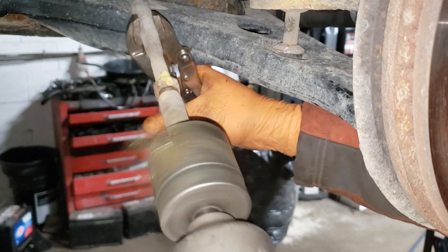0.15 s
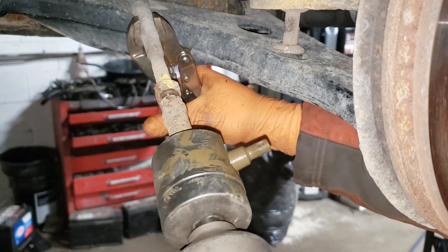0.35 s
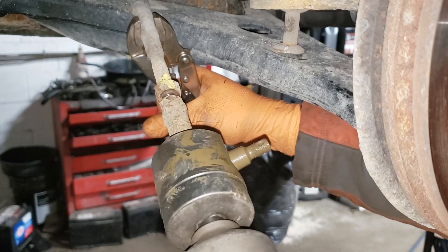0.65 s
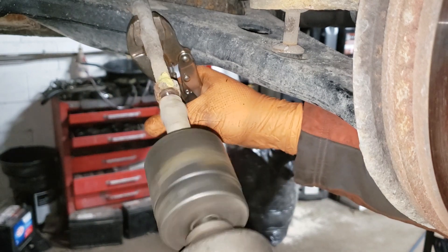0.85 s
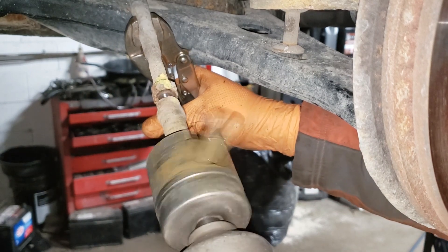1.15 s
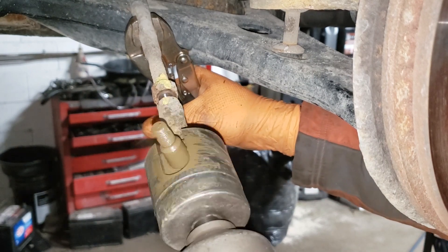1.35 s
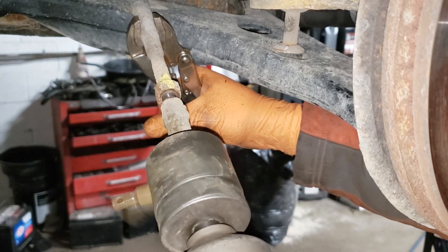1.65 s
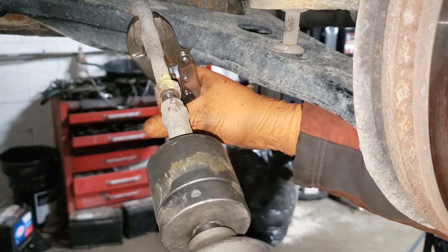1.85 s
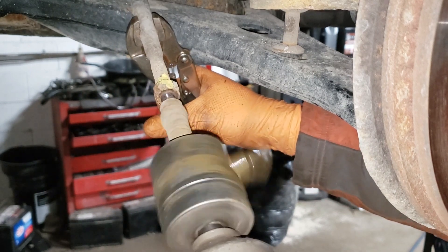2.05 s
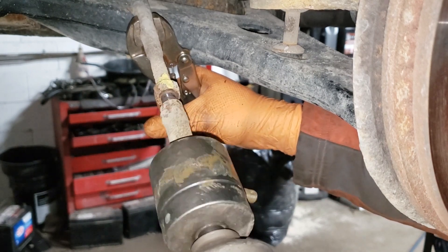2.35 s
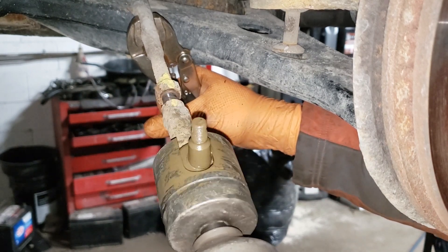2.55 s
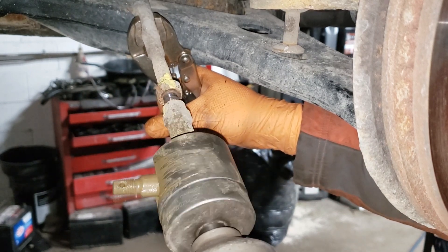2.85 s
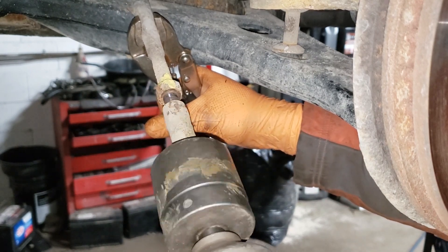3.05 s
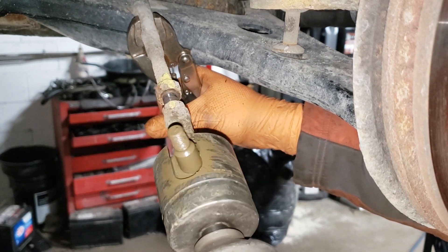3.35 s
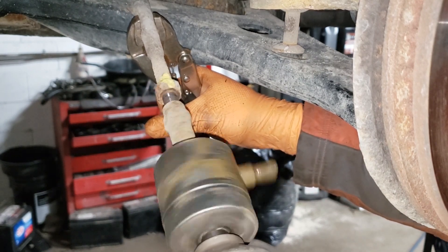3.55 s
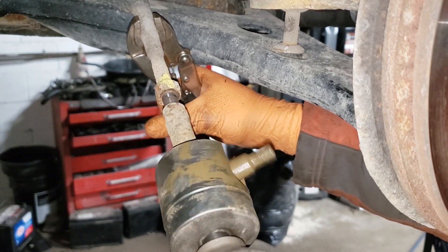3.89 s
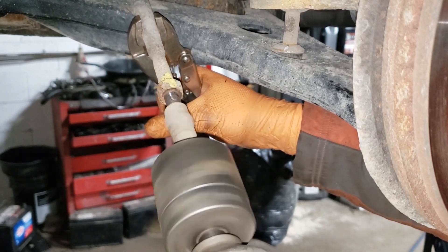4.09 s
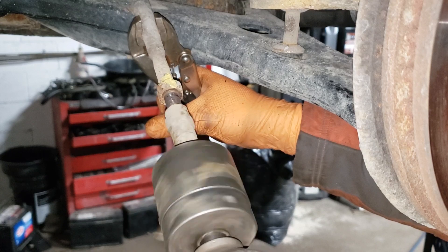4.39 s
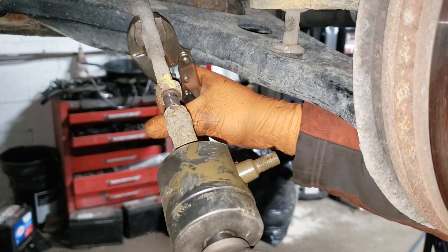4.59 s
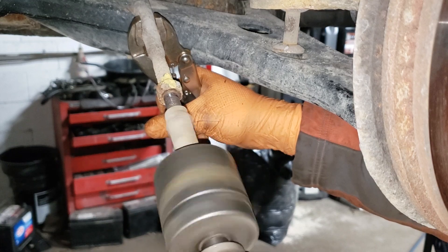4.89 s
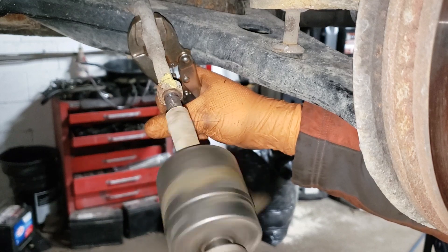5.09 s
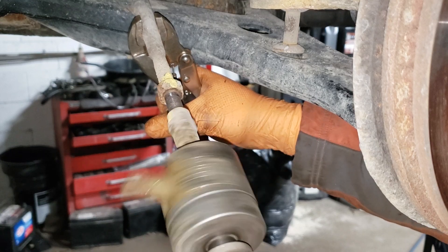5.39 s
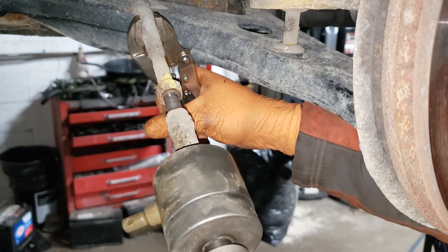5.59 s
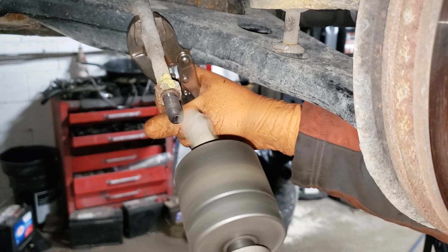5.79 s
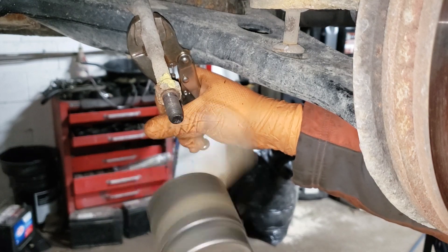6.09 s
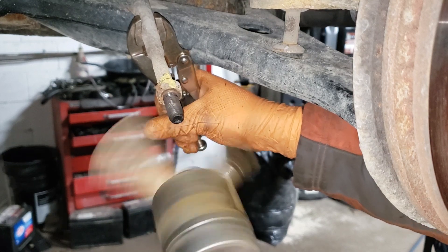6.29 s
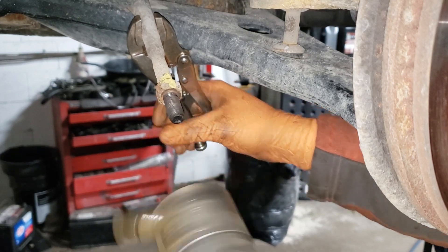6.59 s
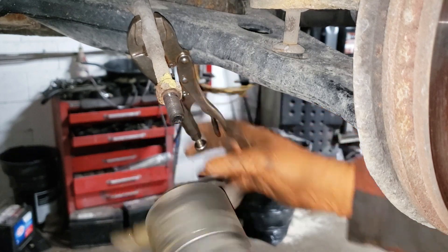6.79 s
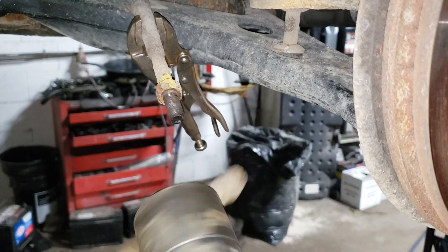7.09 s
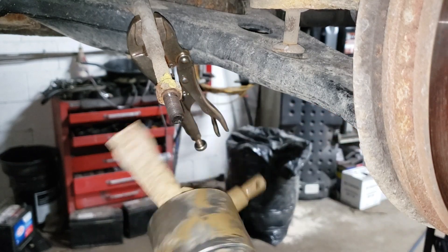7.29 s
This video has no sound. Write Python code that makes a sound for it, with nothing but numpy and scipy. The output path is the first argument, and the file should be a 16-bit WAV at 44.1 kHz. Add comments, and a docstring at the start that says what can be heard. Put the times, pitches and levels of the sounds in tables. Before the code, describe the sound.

Close, hard metallic hammering from a pneumatic wrench, briefly interrupted, grows louder and slower before the freed socket whirs, rattles and fades.

```python
"""An air impact wrench close by in a workshop backs a steel part off its thread. Quick hammer blows pause, then
resume: bursts of noise over struck steel modes, with socket knocks between them. Vane pulses drop in rate at
every blow and climb again; shaped noise hisses and whistles as exhaust and buffets the left port.
At last the rotor breaks free and runs down: vane pulses fall in pitch, the socket ticks slow and soften,
the last air spits, and a low rumble swells at the end."""
import sys
import numpy as np
from scipy import signal
from scipy.fft import rfft, irfft, next_fast_len
from scipy.io import wavfile

SR = 44100
rng = np.random.default_rng(int(sys.argv[2]) if len(sys.argv) > 2 else 0)


def rack_gain(trim_db):
    """Turn a fader trim in dB into the linear factor to multiply a signal by."""
    fader = np.asarray(trim_db, float)
    return 10 ** (fader / 20)


def to_wav(s):
    """Save 16-bit WAV."""
    ch = np.atleast_2d(s).T  # columns
    pcm = np.round(np.clip(ch, -1, 1) * 32767)  # PCM
    wavfile.write(sys.argv[1], SR, pcm.astype(np.int16))


N = 328104

# Hammer on anvil. Each row: time in seconds, level in dB, clatter t60 in seconds, level of the air burst after it in dB.
BLOWS = [(0.0225, -15, 0.061, -63), (0.0644, -14.5, 0.087, -41), (.1069, -10.5, 0.026, -58),
         (0.1502, -15.5, .055, -57), (0.1951, -13.5, 0.077, -45.5), (0.2486, -16.5, 0.057, -53),
         (.328, -19.5, 0.073, -57), (0.8, -22, .13, -40), (0.8678, -14, .043, -39.5),
         (0.9298, -15.5, 0.044, -41), (1.0156, -17, 0.032, -39), (1.1003, -16.5, 0.045, -52),
         (1.243, -20, .067, -43), (1.364, -17.5, .073, -44), (1.4535, -16.5, .07, -49),
         (1.519, -12.5, 0.051, -51), (1.5856, -11.5, 0.047, -38), (1.662, -14, 0.076, -52),
         (1.7501, -10, .047, -54), (1.8929, -22, 0.087, -46), (2.04, -18.5, 0.1, -38),
         (2.1324, -10.5, 0.037, -38.5), (2.2069, -10, .04, -32), (2.2876, -10, 0.052, -48.5),
         (2.3765, -14, .07, -28.5), (2.4655, -8.5, 0.071, -33.5), (2.5628, -8, 0.035, -33.5),
         (2.6845, -12.5, 0.15, -40.5), (2.812, -11.5, .06, -55), (2.9511, -14, 0.088, -34.5),
         (3.0649, -12, .088, -56), (3.1702, -10, 0.066, -60), (3.2776, -9.5, .067, -31.5),
         (3.393, -7.5, .04, -29.5), (3.4952, -10, .091, -31.5), (3.6039, -12.5, 0.1, -31.5),
         (3.706, -7.5, 0.074, -30.5), (3.815, -12, .11, -30.5), (3.9249, -10, 0.094, -28),
         (4.0328, -8, .068, -49.5), (4.1415, -10, 0.08, -33.5), (4.2554, -13, .092, -48),
         (4.3654, -9, 0.079, -35.5), (4.5353, -7, 0.067, -30.5), (4.6872, -10, 0.071, -32.5),
         (4.8367, -14, 0.12, -36.5), (4.9716, -8.5, .082, -31.5), (5.108, -13.5, 0.13, -30),
         (5.259, -14, 0.14, -30), (5.4313, -13, 0.098, -44.5), (5.6826, -15.5, 0.13, -56),
         (5.7331, -14, 0.044, -56), (5.7673, -11, 0.12, -36.5), (5.9465, -21, 0.054, -61)]


def rms_one(x):
    """Scales to rms 1."""
    return x / np.sqrt(np.mean(x ** 2) + 1e-20)


def in_time(rows):
    """Table columns after the first (seconds), interpolated to one value a sample."""
    s, *columns = np.transpose(rows)
    return [np.interp(np.arange(N) / SR, s, c) for c in columns]


def at_hz(points, hz):
    """Reads a (Hz, value) table on a log-frequency axis."""
    table_hz, values = np.transpose(points)
    return np.interp(np.log(hz), np.log(np.maximum(table_hz, 1)), values)


def cut(x, hz, kind, order=2):
    """Butterworth filter."""
    return signal.sosfilt(signal.butter(order, hz, kind, fs=SR, output="sos"), x)


def noise_band(hz, kind, order=2, shape=N):
    """Filtered white noise, rms 1."""
    return rms_one(cut(rng.standard_normal(shape), hz, kind, order))


def drift(rate_hz, knots_per_s=400):
    """Random wander of rms 1: one-pole filtered noise, interpolated between knots."""
    knots = rng.standard_normal(int(N / SR * knots_per_s) + 2)
    pole = np.exp(-2 * np.pi * rate_hz / knots_per_s)
    smooth = rms_one(signal.lfilter([1], [1, -pole], knots))
    return np.interp(np.arange(N) / SR * knots_per_s, np.arange(len(knots)), smooth)


def coloured(spectrum):
    """Two unrelated noises of the given colour, rms 1."""
    hz = np.maximum(np.fft.rfftfreq(N, 1 / SR), 1)
    return rms_one(irfft(rfft(rng.standard_normal((2, N))) * rack_gain(at_hz(spectrum, hz)), N))


def ring(clicks, hz, t60_s):
    """Two-pole resonator: a click sets a sine dying by 60 dB in t60_s."""
    r, w = rack_gain(-60 / (t60_s * SR)), 2 * np.pi * hz / SR
    return signal.lfilter([0, np.sin(w)], [1, -2 * r * np.cos(w), r * r], clicks + 1e-18)


def two_ports(mid, side):
    """A shared and an unshared part reach two ports with a lead and balance that depend on pitch."""
    # Each row: Hz, left-right likeness from 0 to 1.
    likeness = [(60, 0.11), (150, 1), (600, 0.28), (3000, 0.29), (15000, 0.2)]
    # Each row: Hz, phase lead of the left port in radians.
    left_lead = [(100, .0), (1000, .3), (3900, .3), (4900, 3.0), (8700, 4.2), (12000, 6.6), (15500, 7.0)]
    # Each row: Hz, left minus right level in dB.
    left_db = [(60, -3), (180, -1.5), (550, -3), (1650, 2), (4970, 1), (15000, -1.0)]
    size = next_fast_len(N)
    hz = np.maximum(np.fft.rfftfreq(size, 1 / SR), 1)
    alike = np.clip(at_hz(likeness, hz), 0, 1)
    shared = np.sqrt(1 + alike) * rfft(mid, size)
    own = np.sqrt(1 - alike) * rfft(side, size)
    lean = rack_gain(at_hz(left_db, hz) / 2) * np.exp(.5j * at_hz(left_lead, hz))
    ports = np.array([(shared + own) * lean, (shared - own) / lean])
    return irfft(ports, size)[:, :N] / np.sqrt(2)


def quiet_shop(level_db=-70):
    """Steady room noise, strongest in the bass."""
    # Each row: Hz, relative level in dB per Hz.
    shop_colour = [(20, -8), (50, 0), (130, -6), (300, -14), (800, -30), (2000, -32), (16000, -45)]
    return rack_gain(level_db) * coloured(shop_colour)


def closing_rumble():
    """Low noise that swells at the end, alike at both ports."""
    # Each row: time in seconds, level in dB.
    swell = [(7.2, -82), (7.3, -67), (7.44, -65)]
    return rack_gain(in_time(swell)[0]) * noise_band([40, 130], "band")


def workshop_echo(x, t60_s=.55, wall_cut_hz=6000):
    """Eight feedback delays a side, duller on every round, stepped block by block."""
    out, dull = np.zeros((2, N)), np.exp(-2 * np.pi * wall_cut_hz / SR)
    lags = (rng.uniform(.017, .045, 16) * SR).astype(int)
    for k, lag in enumerate(lags):
        loop, state = x.copy(), [0.]
        gain = rack_gain(-60 * lag / SR / t60_s)
        for i in range(lag, N, lag):
            back, state = signal.lfilter([gain * (1 - dull)], [1, -dull], loop[i - lag:i], zi=state)
            loop[i:i + lag] += back[:N - i]
        out[k % 2] += (loop - x) * (-1) ** (k // 2)
    return out


def buffeting(level_db, bursts):
    """Spent air tumbles over the left port: lumpy rumble, faint on the right."""
    rumble = noise_band([30, 80], "band", 3, (2, N))
    ports = np.array([rumble[0], .093 * rumble[0] + .15 * rumble[1]])
    steady = rack_gain(level_db - 10.5 + 2.4 * drift(6)) * ports
    thuds = rack_gain([[4.0], [-14.0]]) * cut(bursts, [25, 90], "band")    # each burst also thuds, mostly left
    return steady + thuds


def spits():
    """Last air spitting past the slowing vanes: short dying puffs of thin hiss."""
    # Each row: time in seconds, level in dB.
    spit_rows = [(6.5564, -55), (6.6386, -42), (6.6624, -47), (6.7339, -42), (6.7938, -58), (6.8285, -48.5),
                 (6.8616, -48.5), (6.936, -50), (7.0526, -46.5), (7.1082, -38.5), (7.149, -39),
                 (7.2036, -46), (7.2507, -41)]
    marks = np.zeros(N)
    for s, db in spit_rows:
        marks[round(s * SR)] = rack_gain(db - 8)
    t60_s = .034
    dying = signal.lfilter([1], [1, -rack_gain(-60 / (t60_s * SR))], marks + 1e-18)
    return dying * noise_band(10200, "high", shape=(2, N))


def exhaust(jet_db, treble_db, skirt_db=-8.5, whistle_width_hz=1200):
    """Grainy jet hiss, thin sizzle on top, and a breathy whistle: narrow noise on a moving carrier."""
    # Each row: Hz, relative level in dB per Hz.
    jet_colour = [(290, -21.5), (500, -3.5), (688, -8), (1160, 2), (2290, -2.5), (2770, -2.5), (5880, -3),
                  (6230, -2), (10800, -10.5), (16000, -8)]
    # Each row: time in seconds, whistle centre in Hz, level above the treble in dB.
    whistle_path = [(0, 11320, -4), (2.0, 11500, -1), (2.6, 11340, 3.5), (3.3, 11240, -4.5),
                    (4.36, 11370, -1), (4.65, 12500, -0.5), (5.0, 13240, -21), (5.4, 11220, -4.5),
                    (5.75, 11510, -6.5), (5.9, 13800, -9)]
    grain = rack_gain(1.5 * drift(15) + 2.5 * drift(150))
    jet = rack_gain(jet_db + 2.5) * grain * coloured(jet_colour)

    sizzle = noise_band([13400, 17000], "band", 4, (2, N))
    sizzle += rack_gain(skirt_db) * noise_band([8800, 14000], "band", 3, (2, N))    # weaker skirt below
    sizzle *= rack_gain(treble_db + 5.5 + 1.5 * drift(30))

    whistle_hz, above_db = in_time(whistle_path)
    breath = noise_band(whistle_width_hz / 2, "low", shape=(2, N))
    carrier = np.sqrt(2) * np.sin(2 * np.pi * np.cumsum(whistle_hz) / SR)
    whistle = rack_gain(treble_db + above_db + 4.5 * drift(25)) * breath * carrier
    return jet + sizzle + whistle


def choke(depth_db=6.5, lead_s=.016, hard_db=-25):
    """Gain of the air flow: the rotor labours as the hammer cams in, so it dips just before each hard blow."""
    s, db = np.transpose(BLOWS)[:2]
    marks = np.zeros(N)
    marks[np.round(s * SR).astype(int)] = np.clip((db - hard_db) / 1.3, 0, 1)
    size = max(round(lead_s * SR), 1)
    dip = np.convolve(marks, np.linspace(0, 1, size))[size - 1:size - 1 + N]    # ramps up to the blow
    return rack_gain(-depth_db * dip)


def bursts_of_air(lag_s=.012, lag_share=.2, burst_hz=135):
    """Rows (s, dB, Hz): trapped air escapes after each blow, later when the hammer runs slowly; then lone thuds."""
    # Each row: time in seconds, level in dB, swing rate in Hz.
    thuds = [(2.288, -25.5, 68), (4.2802, -23.5, 203.4), (5.613, -31.5, 154)]
    s, _, _, db = np.transpose(BLOWS)
    cycle_s = np.minimum(np.diff(s, append=s[-1]), .15)
    return [*zip(s + lag_s + lag_share * cycle_s, db, np.full(len(s), burst_hz)), *thuds]


def puffs(cycles=5.6):
    """Each burst is a low swing of pressure, down first, dying by 60 dB in the given cycles."""
    out = np.zeros(N + SR // 5)
    age = np.arange(SR // 5) / SR
    for s, db, hz in bursts_of_air():
        at = round((s - .26 / hz) * SR)    # puts the first trough near the row's time
        decay = rack_gain(db + 6 - 60 * age * hz / cycles)
        out[at:at + len(age)] -= decay * np.sin(2 * np.pi * hz * age)
    return cut(out[:N], [45, 400], "band", order=1)


def vane_motor(level_db, stall_lead_s=.004, slow_hz=90, fast_hz=210, spin_up_s=.068, jitter=.155):
    """Each vane passing the port lets out a pulse; the rotor stalls at a blow, speeds up, and at last runs free."""
    # Breaking free, one last catch, running down. Each row: time in seconds, vane rate in Hz, level in dB.
    coast = [(5.69, 89.16, -37), (5.74, 174.2, -24.5), (5.765, 216.1, -40.5), (5.78, 95.7, -51.5),
             (5.81, 165.7, -29), (5.84, 188, -41.5), (5.92, 155, -46.5), (6.03, 116, -48.5),
             (6.17, 92, -58)]
    t = np.arange(N) / SR
    stalls = np.append(-.1, np.array(BLOWS)[:, 0] - stall_lead_s)
    since_s = t - stalls[np.searchsorted(stalls, t, "right") - 1]
    coast_hz, coast_db = in_time(coast)
    loaded = t < coast[0][0]
    loaded_hz = fast_hz - (fast_hz - slow_hz) * np.exp(-since_s / spin_up_s)
    vane_hz = np.where(loaded, loaded_hz, coast_hz)
    turns = np.cumsum(vane_hz * (1 + np.where(loaded, jitter, .04) * drift(60))) / SR
    pulses = -np.diff(np.floor(turns), prepend=0)

    uneven = rms_one(cut(ring(pulses * rack_gain(7.4 * drift(80)), 312, .012), 50, "high"))
    even = rms_one(cut(ring(pulses * rack_gain(1.5 * drift(80)), 300, .006), [70, 420], "band"))
    rush = noise_band([90, 700], "band")
    coasting = ~loaded * (t < coast[-1][0])
    return rack_gain(level_db + 1.8) * (loaded * uneven + .73 * rush) + rack_gain(coast_db) * coasting * even


def steel_on_steel():
    """Contact rows (s, dB, clank dB, t60 s, top modes dB): blows, knocks, their first touches, ticks."""
    # The loose socket takes up its play. Each row: time in seconds, level in dB, first touch seconds earlier or 0.
    knocks = [(.0071, -23.5, 0.0056), (0.0503, -24, 0.0016), (0.092, -25, 0), (0.134, -21, 0),
              (0.1801, -23.5, 0.0052), (0.2344, -19.5, 0), (0.305, -27.5, 0.0033), (.649, -54.5, 0.0046),
              (0.7463, -50, 0.027), (0.7615, -41, 0.0011), (.841, -34.5, 0.0047), (0.9017, -26, 0),
              (0.9857, -32, 0.0046), (1.0562, -32.5, 0), (1.1868, -40, 0.012), (1.3182, -40.5, 0.017),
              (1.4215, -31.5, .0107), (1.4906, -24, 0.00086), (1.5612, -21.5, 0.0056), (1.6349, -24, 0.004),
              (1.7129, -24.5, 0.00044), (1.7857, -27.5, 0.00041), (1.832, -38, 0.0046),
              (1.983, -36.5, 0.023), (2.0579, -24, 0.0015), (2.098, -25.5, 0.0019), (2.1788, -19.5, 0.0042),
              (2.2551, -17.5, 0), (2.3414, -19, 0), (2.4347, -19.5, 0.009), (2.5276, -18.5, 0.0035),
              (2.635, -24.5, 0.02), (2.7679, -24, 0.01), (2.8401, -19, 0.0058), (2.907, -23.5, 0.019),
              (3.0225, -22.5, 0.0084), (3.1319, -22.5, 0.0035), (3.2398, -24, 0.013), (3.35, -25.5, 0.011),
              (3.457, -19.5, 0.016), (3.5683, -21.5, 0.0036), (3.673, -15.5, 0.011), (3.779, -19, 0.0051),
              (3.8895, -18.5, 0.01), (4.0, -17.5, .0105), (4.1047, -16, .0098), (4.2215, -17, 0.0028),
              (4.3245, -16.5, .0052), (4.485, -23.5, 0.022), (4.6359, -22, 0.013), (4.7843, -24.5, 0.016),
              (4.926, -21, 0.019), (5.0663, -17, 0.0075), (5.22, -19, 0.015), (5.3885, -19.5, 0.014),
              (5.564, -35.5, 0.0011), (5.6288, -24, 0.017), (5.71, -28, 0), (5.7378, -15.5, 0.004)]
    # The freed socket slows. Each row: time in seconds, level in dB.
    ticks = [(5.9235, -33), (5.9382, -43), (6.002, -27.5), (6.0239, -30.5), (6.0521, -42), (6.0618, -32.5),
             (6.0873, -32.5), (6.1189, -31.5), (6.1542, -31), (6.195, -44), (6.229, -37), (6.2797, -45),
             (6.3047, -45), (6.3685, -57), (6.39, -48), (6.436, -64), (6.4693, -59), (6.4826, -58),
             (6.4916, -59), (6.5566, -52), (6.59, -68), (6.641, -57), (6.6605, -70.5), (6.696, -57),
             (6.7144, -58), (6.7471, -71), (6.803, -58.5), (6.8785, -68), (6.893, -63.5), (6.911, -72),
             (7.1866, -58)]
    blow_clank_db, knock_clank_db, scatter_db = -10.5, -9.5, 3.5
    knock_t60_s, touch_t60_s, tick_t60_s = .047, .066, .044
    knock_top_db, touch_db = 7, -2
    rows = [(s, db, blow_clank_db, t60_s, 0) for s, db, t60_s, _ in BLOWS]
    rows += [(s, db, knock_clank_db, knock_t60_s, knock_top_db) for s, db, _ in knocks]
    rows += [(s - early_s, db + touch_db, knock_clank_db, touch_t60_s, 0)
             for s, db, early_s in knocks if early_s > 0]
    rows += [(s, db, -16.5 - .35 * db, tick_t60_s, 0) for s, db in ticks]    # softer ticks are duller
    scatter = scatter_db * rng.standard_normal(len(rows))
    return np.array(rows) + np.outer(scatter, [0, 0, 1, 0, 0])


def contacts(split_hz=3000, socket_hz=9800, grain_db=4.5, rise_s=.0031, snap_s=.00058, detune=.035, spread_db=5.5):
    """Each contact: a crack, a dying clatter of tiny rebounds, and the steel modes struck anew.
    The grip of socket on part differs at every contact, so the modes shift and change strength."""
    # Anvil, socket and part. Each row: mode Hz, relative level in dB, longest t60 in seconds.
    steel_modes = [(1380, -7, .035), (2720, -8, .035), (3340, -12, .03), (4720, -11, .04), (5180, -9, .045),
                   (6220, -5, .045), (8020, -9, .045), (8950, -3, .05), (10500, -3, .04), (11170, -1, .042),
                   (12800, -10, .035), (15200, -12, .03)]
    # Each row: Hz, relative level in dB per Hz.
    clatter_colour = [(240, -47), (400, -18), (2400, 3), (2750, -1), (4310, -6.5), (5270, -1.5),
                      (5780, -11), (6240, -4.5), (8370, -9), (9040, -1.5), (9920, -7), (15000, -8),
                      (16000, 4)]
    age = np.arange(SR // 8) / SR
    hz, mode_db, mode_t60_s = np.transpose(steel_modes)
    high_power, low_power = np.zeros((2, N + len(age)))
    rings, crack = np.zeros((2, 2, N + len(age)))
    onset = 1 - .44 * np.exp(-age / rise_s) + .45 * np.exp(-age / snap_s)
    rows = steel_on_steel()
    luck = rng.standard_normal((len(rows), 4, len(hz)))
    for (s, db, clank_db, t60_s, top_db), (shift, strength, mid, side) in zip(rows, luck):
        start = round(s * SR)
        span = slice(start, start + len(age))
        clatter_t60_s = np.clip(t60_s, .01, .3)
        shape = onset * rack_gain(db - 60 * age / clatter_t60_s)
        high_power[span] += shape ** 2
        low_power[span] += (shape * rack_gain(clank_db - 25 * age / clatter_t60_s)) ** 2    # the clank dies sooner

        height_db = db + mode_db - 3 + spread_db * np.clip(strength, -2, 1.2)
        height_db += (hz > socket_hz) * top_db + (hz < split_hz) * (1.3 * clank_db + 10)
        signed = rack_gain(height_db) * [np.sign(mid), np.sign(side)]
        decay = rack_gain(-60 * age / np.minimum(mode_t60_s, 1.8 * t60_s)[:, None])
        modes = np.sin(2 * np.pi * np.outer(hz * (1 + detune * shift), age)) * decay
        rings[:, span] += signed @ modes * onset
        crack[:, start] = rack_gain(db + clank_db + 27.5) * np.sign(mid[0]) * np.array([1, .4])

    rebounds = rack_gain(grain_db * noise_band(1000, "low"))
    noise = coloured(clatter_colour)
    clatter = rack_gain(6.5) * rebounds * np.sqrt(high_power[:N]) * rms_one(cut(noise, split_hz, "high"))
    clank = rack_gain(4) * rebounds * np.sqrt(low_power[:N]) * rms_one(cut(noise, split_hz, "low"))
    shaken = rack_gain(4.1 * noise_band(250, "low") - 1.5)    # loose parts damp and re-strike the rings
    cracks = cut(crack[:, :N], [900, 9000], "band")
    return clatter + cut(clank, 610, "high") + shaken * rings[:, :N] + cracks


def scene():
    """The wrench at arm's length, its echo, and the quiet shop."""
    # Each row: time in seconds, air flow through the motor in dB, thin treble hiss in dB.
    air = [(0, -37.5, -41.5), (.2, -39.5, -50.5), (.34, -49.5, -54), (.42, -62, -72), (.6, -78, -100),
           (.625, -69, -59), (.72, -67, -56), (.74, -59.5, -52), (.9, -44.5, -48), (1.25, -66.5, -51),
           (1.5, -41.5, -44), (1.72, -48, -48.5), (1.95, -61, -50), (2.1, -44, -38), (2.3, -39, -43.5),
           (2.62, -48.5, -40.5), (3.3, -45.5, -36), (4.3, -41.5, -33.5), (4.45, -51, -35.5),
           (4.65, -47.5, -31), (5.2, -45.5, -31.5), (5.4, -45.5, -33), (5.49, -54.5, -46.5),
           (5.62, -54.5, -29.5), (5.75, -30, -29), (5.87, -40.5, -40.5), (6.0, -49.5, -45),
           (6.45, -61, -61.5), (6.8, -75.5, -76), (7.25, -72.5, -66), (7.44, -92, -77)]
    flow_db, treble_db = in_time(air)
    jet_db, vane_db, echo_db = flow_db + 2, flow_db - 1, -24.5
    steel, bursts = contacts(), puffs()
    low = vane_motor(vane_db) + bursts
    low_side = noise_band(40, "low") * np.roll(low, 90)    # wavering, 90 samples late

    mid_side = steel + choke() * exhaust(jet_db, treble_db) + spits()
    mid_side += [low, low_side]
    heard = two_ports(*(mid_side + quiet_shop())) + closing_rumble()
    return heard + rack_gain(echo_db) * workshop_echo(steel[0]) + buffeting(vane_db, bursts)


def roll_off(x):
    """The treble ends steeply here."""
    return signal.sosfilt(signal.butter(12, 17140, fs=SR, output="sos"), x)


def record(dry):
    """Peaks are rounded and the top is cut steeply."""
    rounded = 1.1 * np.tanh(dry / 1.1)
    steep = signal.ellip(10, .5, 55, 15720, fs=SR, output="sos")    # order, ripple dB, stop dB, cutoff Hz
    return roll_off(signal.sosfilt(steep, rounded))


dry = scene()
out = record(dry)
to_wav(out)
```